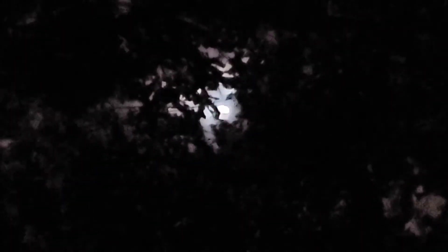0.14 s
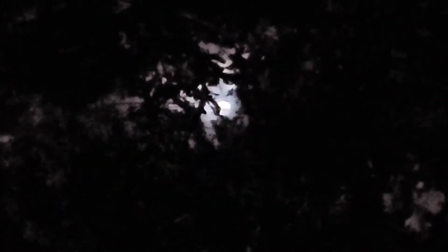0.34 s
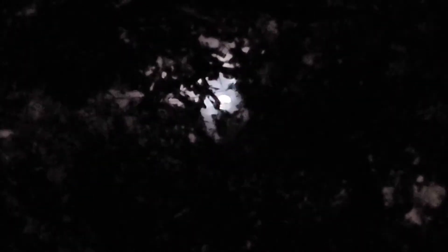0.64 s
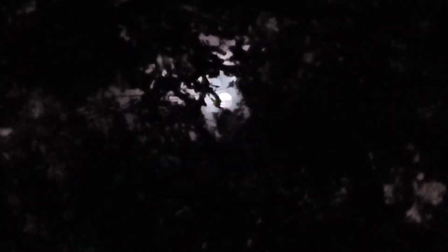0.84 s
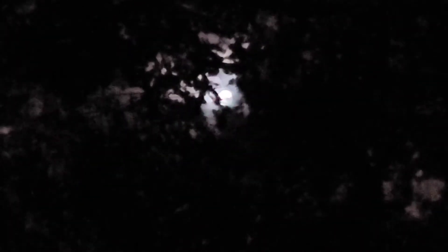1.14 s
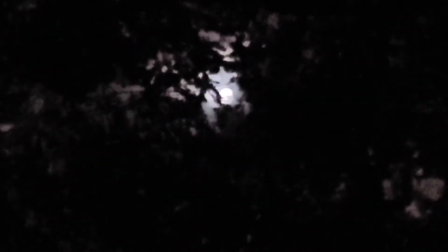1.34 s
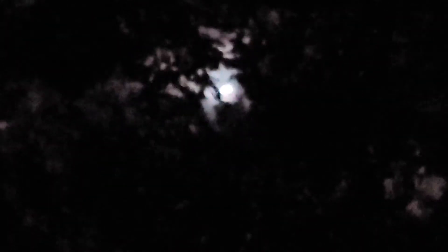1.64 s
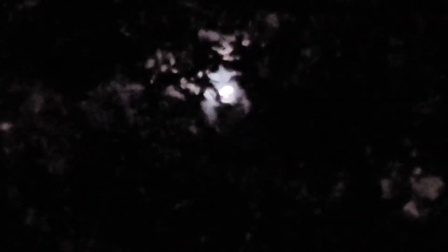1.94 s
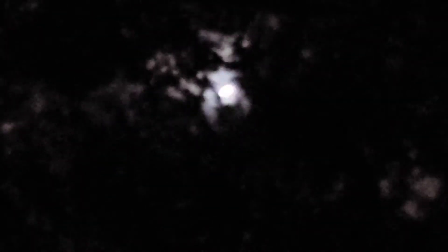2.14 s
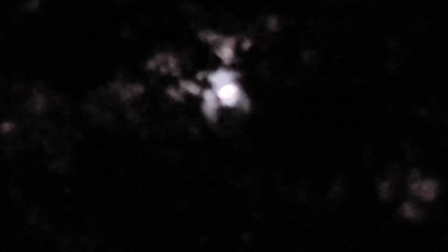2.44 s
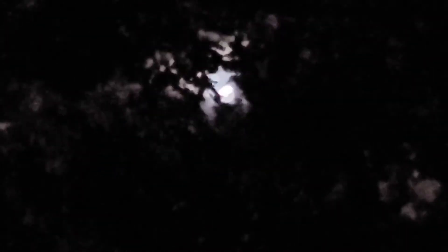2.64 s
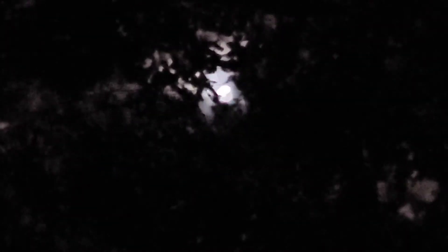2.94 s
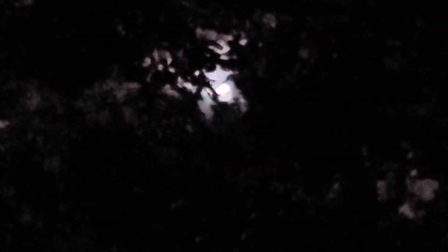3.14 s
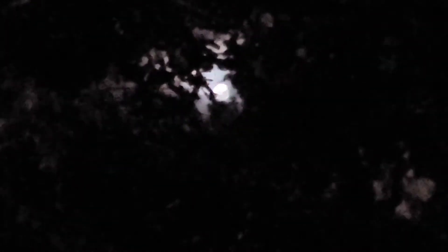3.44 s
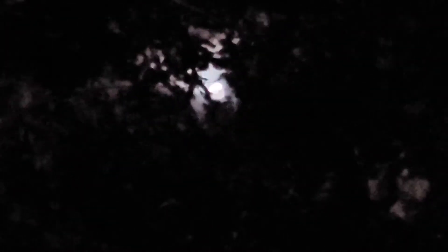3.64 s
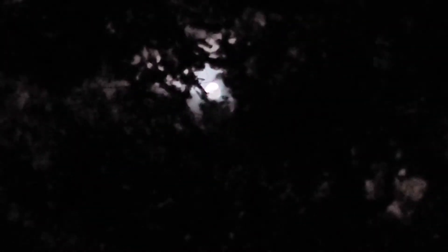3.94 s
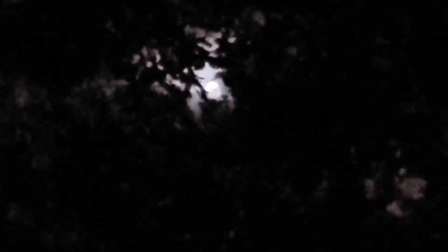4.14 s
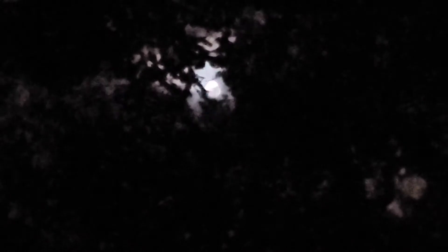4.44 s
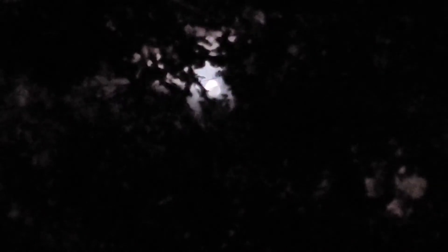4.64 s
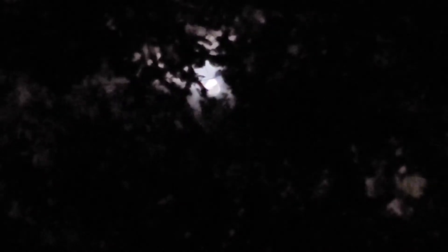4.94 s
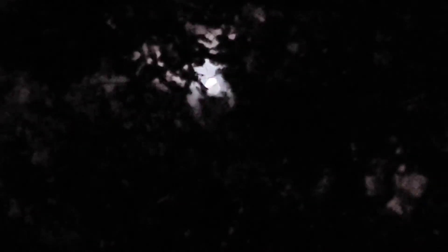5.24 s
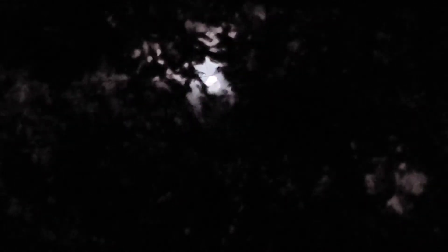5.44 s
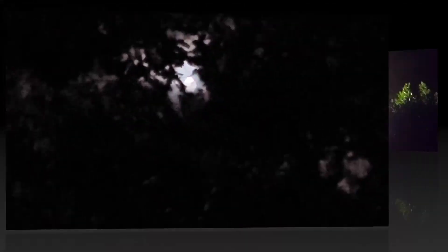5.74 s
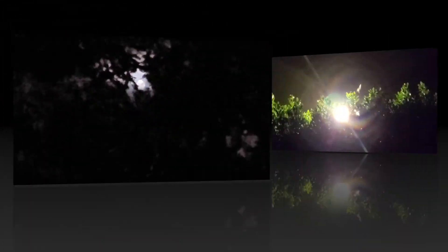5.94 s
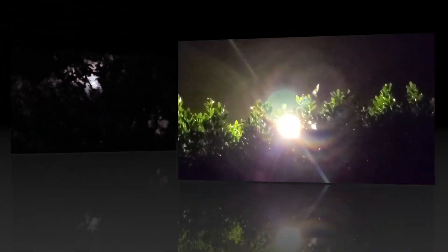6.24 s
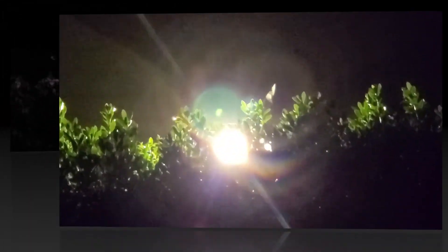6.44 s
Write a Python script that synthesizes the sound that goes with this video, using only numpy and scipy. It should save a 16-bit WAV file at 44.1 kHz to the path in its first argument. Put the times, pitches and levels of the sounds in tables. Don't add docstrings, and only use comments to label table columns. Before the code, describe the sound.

Overlapping frog chorus by a night pond, rasping katydids, shrill crickets, tiny twig snaps, and low wind rumble near the end.

```python
import sys
import numpy as np
from scipy import signal
from scipy.fft import rfft, irfft, next_fast_len
from scipy.io import wavfile
from scipy.ndimage import uniform_filter1d, map_coordinates

SR = 44100
rng = np.random.default_rng(int(sys.argv[2]) if len(sys.argv) > 2 else 0)


def unload_wav(signal):
    wavfile.write(
        sys.argv[1],
        SR,
        np.round(np.clip(np.atleast_2d(signal).T, -1, 1) * 32767).astype(np.int16),
    )


def ratio_of_db(decibels):
    return 10 ** (np.asarray(decibels, float) / 20)


N = 290619
T = np.arange(N) / SR

# (frequency [Hz], level per Hz [dB])
AIR_SPECTRUM = [(240, -26), (400, -31), (994, -21), (2580, -6.5), (2830, -0.5), (3100, -5.5), (3550, -22),
                (6130, -12), (7030, -22), (8180, -24.5), (9370, -22), (11900, -25.5), (15000, -23)]
# (frequency [Hz], level per Hz [dB])
HUM_SPECTRUM = [(15, -38), (27, -16), (55, 3), (114, 1), (141, -8), (166, -5), (339, -16.5), (425, -33.5),
                (500, -52), (650, -80), (1100, -120)]
# (frequency [Hz], level over the hum [dB])
ENGINE_NOTES = [(119, -7), (156, -12.5)]
# (nearest time [s], half length [s], level [dB])
VEHICLES = [
    (.6, 0.38, -56.5),
    (1.6, 0.42, -56),
    (2.65, 0.4, -52),
    (3.85, 0.41, -57),
    (4.95, 0.52, -56),
    (5.8, 0.43, -55),
]
# (pitch [Hz], pitch spread [Hz], pulse rate [1/s], pulse length [ms], level [dB],
# left over right [dB])
CRICKET_KINDS = [(3128, 66.7, 48, 5.6, -50, -1), (4980, 20, 77, 3.6, -63, -11.5),
                 (6144, 120, 82, 2.86, -52.5, -2.5), (8160, 282, 91, 5.1, -59.5, -1.5)]
# (start [s], length [s], overtone level [dB], fundamental level [dB], overtone pitch [Hz])
FAR_TRILLS = [(-.1, 0.57, -47.5, -57, 2594), (0.538, 0.51, -49.5, -59, 2590),
              (0.804, 0.25, -44, -62.5, 2480), (1.067, 0.59, -38, -52, 2432),
              (1.294, 0.21, -37, -54.5, 2437), (2.26, 0.45, -38, -48.5, 2470), (2.428, .5, -37, -45, 2488),
              (2.715, 0.37, -44, -61, 2530), (3.624, 0.56, -41, -53, 2427), (3.803, 0.32, -43, -51, 2580),
              (4.256, 0.53, -48, -55.5, 2590), (4.6, 0.7, -46.5, -56, 2410),
              (5.089, 0.32, -37, -47.5, 2474), (5.273, 0.37, -39.5, -54, 2480),
              (5.63, 0.31, -43, -56.5, 2507), (5.898, 0.11, -47, -69, 2520),
              (6.39, 0.27, -47.5, -54.5, 2450)]
# (pulse rate [1/s], pitch ratio [1], left delay [ms])
FAR_SINGERS = [(52, .985, -.35), (48.5, 1.01, .1), (55, .995, -.3), (53.5, 1.015, -.15)]
# (middle [s], half length [s], level [dB])
KATYDID_BURSTS = [(0, 0.036, -48), (.47, 0.077, -47.5), (.67, 0.057, -47), (1.03, .04, -49),
                  (1.23, 0.064, -49), (1.55, 0.17, -63), (1.72, 0.022, -51), (1.93, 0.057, -50.5),
                  (2.04, 0.078, -49), (2.27, 0.054, -47.5), (2.46, 0.046, -50.5), (2.66, 0.041, -52),
                  (3.0, 0.076, -45), (3.3, 0.022, -77), (3.6, 0.07, -46), (4.0, 0.21, -55),
                  (4.4, 0.028, -48.5), (4.58, 0.073, -44), (4.75, 0.017, -57), (5.1, 0.028, -54),
                  (5.3, 0.078, -46.5), (5.55, .1, -53.5), (5.92, 0.027, -50.5), (6.07, 0.097, -50.5),
                  (6.5, 0.06, -49.5), (6.58, 0.042, -51)]
# (frequency [Hz], level per Hz [dB])
WING_SPECTRUM = [(1500, -74), (1950, 6.5), (2400, 4), (3700, -0.5), (4500, 2), (5500, -6.5), (7000, -28),
                 (8500, -30), (10500, -19), (12300, -10.5), (14300, -9.5)]
# (first pulse [s], last even pulse [s], left fundamental [dB], right fundamental [dB])
NEAR_TRILLS = [
    (0.178, 0.506, -42, -40),
    (2.23, 2.664, -33, -33),
    (4.407, 5.024, -35, -28.5),
    (5.187, 5.586, -34, -33),
    (6.535, 6.621, -39, -46),
]
NEAR_PULSES = [18, 26, 31, 24, 6]
# (pitch [Hz], pulse length [ms], pitch climb [1/ms], left overtone [dB],
# right overtone [dB], left delay [ms])
NEAR_VOICES = [(1362, 2.5, 0.029, 6.5, 4.5, -0.14), (1406, 2.46, 0.018, 4.5, -3.5, -0.17),
               (1487, 2.58, 0.031, 13.5, -3, -0.26), (1395, 2.5, 0.016, -24, 2, -0.19),
               (1420, 5.6, 0.0052, -16, -1, -0.24)]
# (time [s], peak level [dB], left over right [dB])
TWIG_SNAPS = [(0.7794, -54, -17), (0.8944, -46, -9), (0.9794, -53, -14), (2.5581, -50.5, -2.5),
              (3.266, -48, -4), (4.2552, -48.5, -9), (5.6994, -48, -2.0), (5.9194, -47, -0.5),
              (6.468, -61, 5)]
# (frequency [Hz], level per Hz [dB])
WIND_SPECTRUM = [(15, -31), (25, -12), (157, 1.5), (220, -16), (269, -7), (361, -13.5), (402, -9.5),
                 (734, -41), (1000, -36), (1300, -64), (2200, -120)]
# (frequency [Hz], level per Hz [dB])
GUST_SPECTRUM = [(90, -19), (152, 1.5), (200, -11), (290, -17), (420, -25.5)]
# (middle [s], level [dB])
WIND_GUSTS = [
    (6.105, -37),
    (6.19, -45),
    (6.312, -38),
    (6.51, -40),
    (6.6, -42),
]
# (frequency [Hz], level over the band's usual level [dB])
KEEP_LEVELS = [(330, -20), (430, 1.5), (560, 3), (900, 2), (1080, -20), (3380, -20), (3480, 1.5),
               (3620, 1.5), (3750, -8), (4600, -11), (6800, -14), (7050, 3), (7350, 3), (7600, -14),
               (9000, -14), (9400, 3.5), (11200, 3), (11900, -5), (12800, -1.5), (14600, -1)]


def unit(x):
    return x / np.sqrt(np.mean(x ** 2) + 1e-20)


def wobble(rate):
    coarse = T[::32]
    points = rng.standard_normal(int(N * rate / SR) + 4)
    return np.interp(T, coarse, map_coordinates(points, [coarse * rate]))


def noise(spectrum, alike):
    size = next_fast_len(N)
    below = [(spectrum[0][0] / 2, -120)]
    above = [(spectrum[-1][0] * 1.24, -120)]
    hz, db = np.transpose(below + list(spectrum) + above)
    gain = ratio_of_db(np.interp(np.log(np.fft.rfftfreq(size, 1 / SR) + 1), np.log(hz), db))
    mid, side = irfft(rfft(rng.standard_normal((2, size))) * gain, size)[:, :N]
    angle = np.arccos(np.clip(alike, -1, 1)) / 2
    mid, side = np.cos(angle) * mid, np.sin(angle) * side
    return unit(np.array([mid + side, mid - side]))


def bells(rows, floor_db):
    middle, half, db = np.transpose(rows)[..., None]
    swells = ratio_of_db(db) ** 2 * np.exp(-((T - middle) / half) ** 2)
    return np.sqrt(ratio_of_db(floor_db) ** 2 + np.sum(swells, axis=0))


def ports(x, lag_ms):
    return np.array([np.roll(x, round(lag_ms * SR / 1000)), x])


def chirp(tau, hz, ms, glide, lead_ms=0):
    bell = np.exp(-.5 * ((1000 * tau + lead_ms) / ms) ** 2)
    return bell * np.sin(2 * np.pi * hz * tau * (1 + 500 * glide * tau))


def train(rate, jitter):
    speed = rate * (1 + jitter * wobble(4))
    cycle = np.cumsum(speed) / SR + rng.random()
    nearest = np.round(cycle)
    return (cycle - nearest) / speed, nearest.astype(int)


def woods(x, t60):
    t = np.arange(SR // 2) / SR
    tail = rng.standard_normal((2, len(t))) * ratio_of_db(-60 * t / t60) * (t > .004)
    return signal.fftconvolve(x, tail / np.linalg.norm(tail[0]), axes=1)[:, :N]


def even_out(x):
    return x / np.sqrt(np.abs(uniform_filter1d(np.mean(x ** 2, 0), size=SR // 5)))


def low_ports(x):
    lead = 11
    left = np.pad(x[0, lead:], (0, lead), "edge")
    return ratio_of_db([[-.4], [.4]]) * np.array([left, x[1]])


def night_air():
    return ratio_of_db(-49.5) * noise(AIR_SPECTRUM, alike=0.18)


def far_traffic():
    level = bells(VEHICLES, floor_db=-56.5) * ratio_of_db(0.57 * wobble(5.6))
    hum = noise(HUM_SPECTRUM, alike=0.94)
    for hz, db in ENGINE_NOTES:
        loudness = ratio_of_db(db + 2.9 * wobble(6))
        hum = hum + loudness * np.sin(2 * np.pi * np.cumsum(hz + 4 * wobble(8)) / SR)
    return low_ports(level * hum)


def crickets():
    out = np.zeros((2, N))
    for hz, spread_hz, rate, ms, db, pan_db in CRICKET_KINDS:
        song = np.zeros((2, N))
        for place, luck in zip(np.linspace(-1.5, 1.5, num=5), rng.standard_normal((5, 2))):
            tau, k = train(rate * (1 + .02 * luck[0]), jitter=.03)
            tau = tau + 0.000402 * rng.standard_normal(k[-1] + 1)[k]
            strokes = chirp(tau, hz + spread_hz * place, ms / 2, glide=-0.004)
            song += ports(ratio_of_db(1.03 * wobble(3.39)) * strokes, .3 * luck[1])
        fade_db = -.9 * hz / 1000 * np.clip((T - 5.7) / .5, 0, 1)
        level = ratio_of_db(db + fade_db + np.c_[[pan_db, -pan_db]] / 2)
        out += level * unit(song + ratio_of_db(6.0) * woods(song, t60=0.61))
    return out


def frog_chorus():
    swell_s, die_s = .075, 0.056
    start, length, high_db, low_db, trill_hz = np.transpose(FAR_TRILLS)[..., None]
    rise = (1 - np.exp(-np.clip(T - start, 0, None) / swell_s)) ** 2
    power = rise * np.exp(-np.clip(T - start - length, 0, None) / die_s)
    high_each = ratio_of_db(high_db) ** 2 * power
    pond_power, pond_hz = ratio_of_db(-59) ** 2, 2530
    high_power = pond_power + np.sum(high_each, axis=0)
    low_power = ratio_of_db(-74) ** 2 + np.sum(ratio_of_db(low_db) ** 2 * power, axis=0)
    high_hz = (pond_power * pond_hz + np.sum(high_each * trill_hz, axis=0)) / high_power
    low, high = np.zeros((2, 2, N))
    for turn, (rate, ratio, lag_ms) in enumerate(FAR_SINGERS):
        lead = np.sum(high_each[turn::len(FAR_SINGERS)], axis=0) / high_power
        tau, k = train(rate, jitter=.03)
        hz = ratio * high_hz[np.searchsorted(k, k)]
        luck_db = 3 * wobble(2.5) + 1.5 * rng.standard_normal(k[-1] + 1)[k]
        size = np.sqrt(lead + .12) * ratio_of_db(luck_db)
        overtone = chirp(tau, hz, ms=1.4, glide=.02)
        overtone += ratio_of_db(-24) * chirp(tau, 1.536 * hz, ms=2.1, glide=0.019)
        high += ports(size * overtone, lag_ms)
        low += ports(size * chirp(tau, .55 * hz, ms=1.5, glide=.03), lag_ms)
    high = even_out(high + ratio_of_db(-2) * woods(high, t60=0.31))
    low = even_out(low + ratio_of_db(1.5) * woods(low, t60=0.23))
    high = np.sqrt(high_power) * ratio_of_db([[.6], [-.6]]) * high
    return high + np.sqrt(low_power) * ratio_of_db([[-.8], [.8]]) * low


def katydids():
    bursts = bells(KATYDID_BURSTS, floor_db=-59.5)
    grain = ratio_of_db(1.48 * wobble(120) + np.c_[[-1.1, 1.1]])
    return bursts * grain * noise(WING_SPECTRUM, alike=0.029)


def near_frogs():
    out = np.zeros((2, N))
    for trill, voice, count in zip(NEAR_TRILLS, NEAR_VOICES, NEAR_PULSES):
        first, last, *db = trill
        hz, ms, glide, *over_db, lag_ms = voice
        u = np.arange(count + 1) / (count - 1)
        at = first + (last - first) * (u + .04 * u * (u - 1)) + 0.00171 * (u > 1)
        k = np.searchsorted((at[1:] + at[:-1]) / 2, T)
        luck = .6 * rng.standard_normal((3, count + 1))
        tau = T - (at + 0.00012 * luck[0])[k]
        swell_db = -7 * np.exp(-u / 0.087)
        first_tone = chirp(tau, hz, ms, glide)
        second = chirp(tau, 1.977 * hz, 0.83 * ms, 0.63 * glide, lead_ms=3.9)
        third = ratio_of_db(-19) * chirp(tau, 2.9 * hz, .75 * ms, .5 * glide)
        low = ratio_of_db(swell_db + luck[1])[k] * first_tone + ratio_of_db(2.2 * swell_db)[k] * third
        high = ratio_of_db(2.6 * swell_db + luck[2])[k] * second
        out += ratio_of_db(np.c_[db]) * (ports(low, lag_ms) + ratio_of_db(np.c_[over_db]) * ports(high, lag_ms))
    return out + ratio_of_db(-13.5) * woods(out, t60=0.4)


def twigs():
    out, t = np.zeros((2, N + 400)), np.arange(400) / SR
    for s, db, pan_db in TWIG_SNAPS:
        snap = np.diff(rng.standard_normal(len(t) + 1)) * ratio_of_db(-60 * t / 0.0079)
        snap += ratio_of_db(-7.5) * np.sin(2 * np.pi * 620 * t) * ratio_of_db(-60 * t / .008)
        start = round(s * SR)
        out[:, start:start + len(t)] += ratio_of_db(db + 1 + np.c_[[pan_db, -pan_db]] / 2) * snap
    return out[:, :N]


def wind():
    from_s, rise_s, gust_half_s = 5.687, 0.51, 0.022
    rise = np.clip((T - from_s) / rise_s, 0, 1) ** 2 * ratio_of_db(-45.5)
    breeze = rise * ratio_of_db(1.2 * wobble(25)) * noise(WIND_SPECTRUM, alike=1.0)
    swells = bells([(s, gust_half_s, db) for s, db in WIND_GUSTS], floor_db=-87.5)
    return low_ports(breeze + swells * noise(GUST_SPECTRUM, alike=1.0))


def scene():
    singers = crickets() + frog_chorus() + katydids() + near_frogs()
    return night_air() + far_traffic() + singers + twigs() + wind()


def thinned(x):
    hz, _, z = signal.stft(x, SR, nperseg=2048)
    size = np.abs(z).mean(0)
    fine = uniform_filter1d(size, size=3, axis=0)
    wide = uniform_filter1d(size, size=9, axis=0)
    band = np.where(hz[:, None] < 1200, fine, wide)
    usual = np.median(band, axis=1, keepdims=True)
    over = ratio_of_db(np.interp(hz, *np.transpose(KEEP_LEVELS)))[:, None]
    faint = over * usual + ratio_of_db(-112)
    masked = ratio_of_db(-19) * uniform_filter1d(size, size=90, axis=0) * (hz > 3300)[:, None]
    luck = rng.standard_normal((len(hz) // 14 + 1, z.shape[2]))
    luck = np.repeat(luck, 14, axis=0)[:len(hz)]
    luck = luck + .6 * rng.standard_normal(z.shape[2])
    luck = unit(uniform_filter1d(luck, size=3, axis=1))
    keep = band > ratio_of_db(2.6 * luck) * np.maximum(faint, masked)
    treble_cut = np.where(hz < 14620, 1, ratio_of_db(-47))[:, None]
    return signal.istft(z * keep * treble_cut, SR, nperseg=2048)[1][:, :N]


def roll_off(x):
    return signal.sosfilt(signal.butter(12, 15760, fs=SR, output="sos"), x)


def record(dry):
    mix = thinned(dry)
    return roll_off(mix)


dry = scene()
out = record(dry)
unload_wav(out)
```